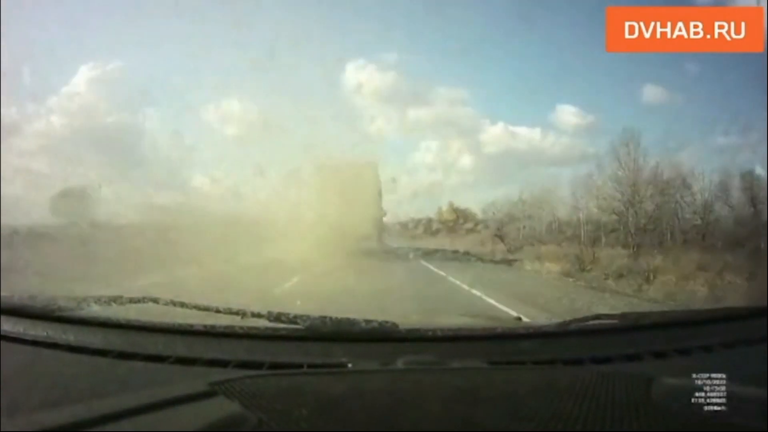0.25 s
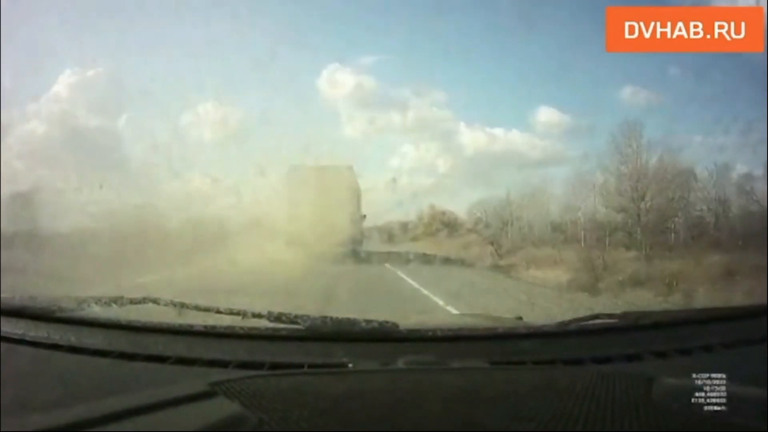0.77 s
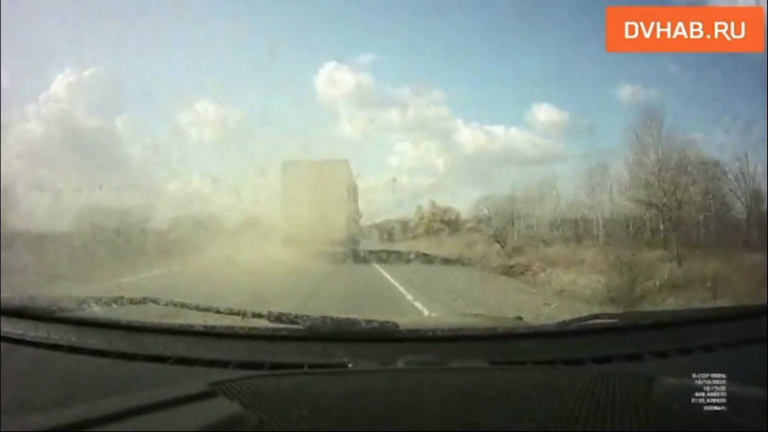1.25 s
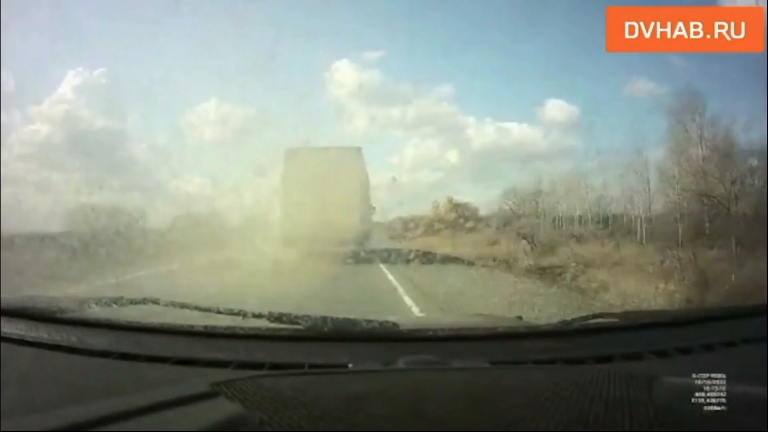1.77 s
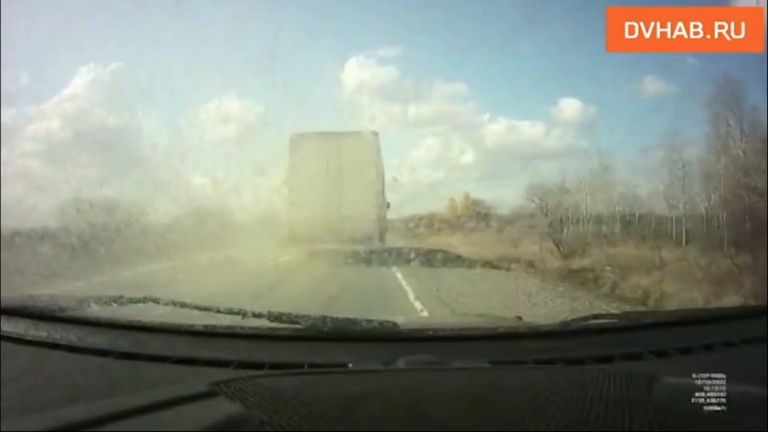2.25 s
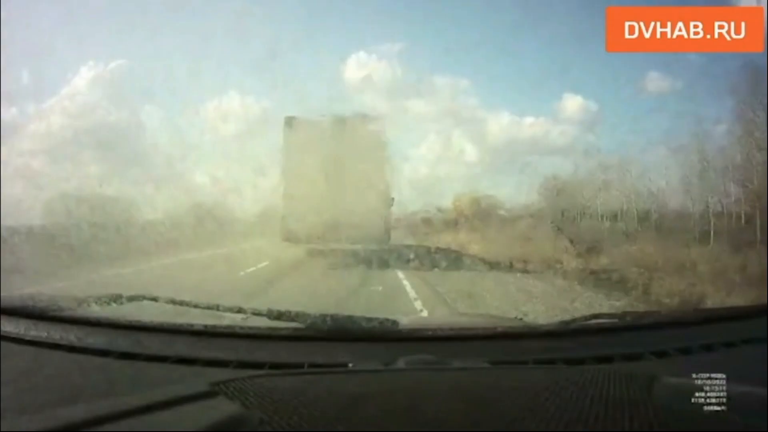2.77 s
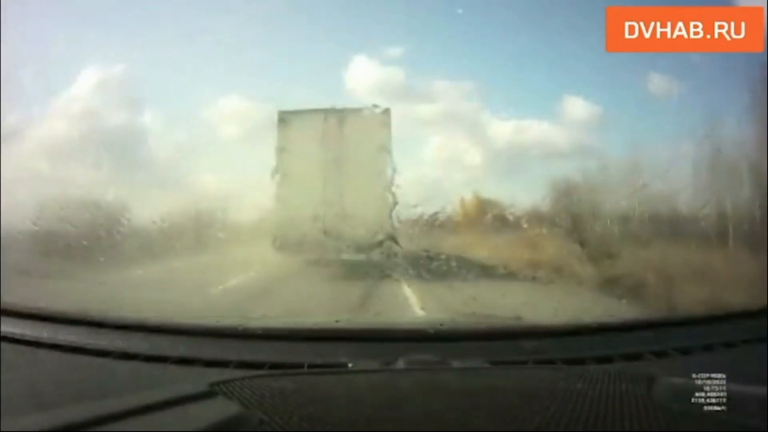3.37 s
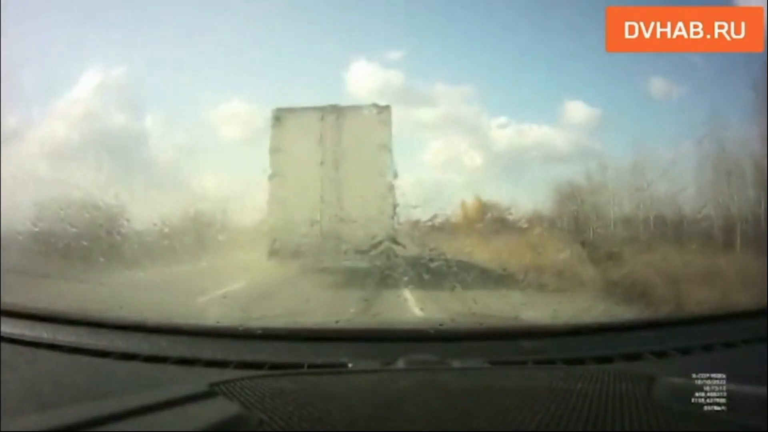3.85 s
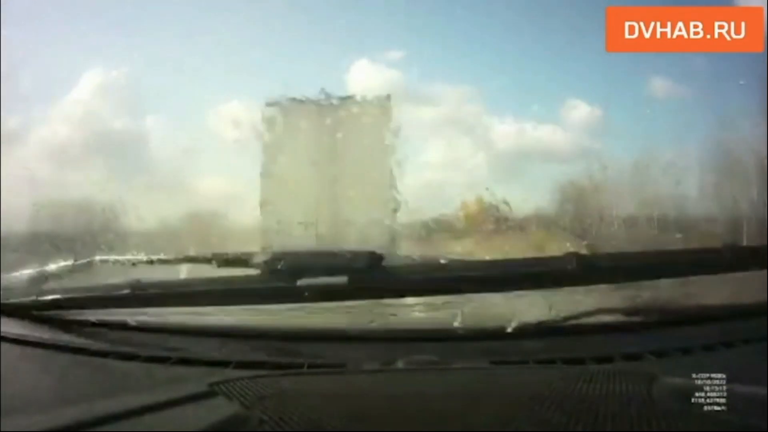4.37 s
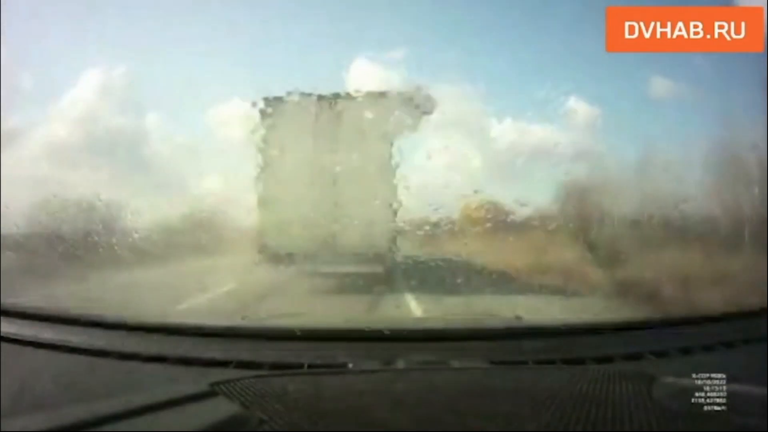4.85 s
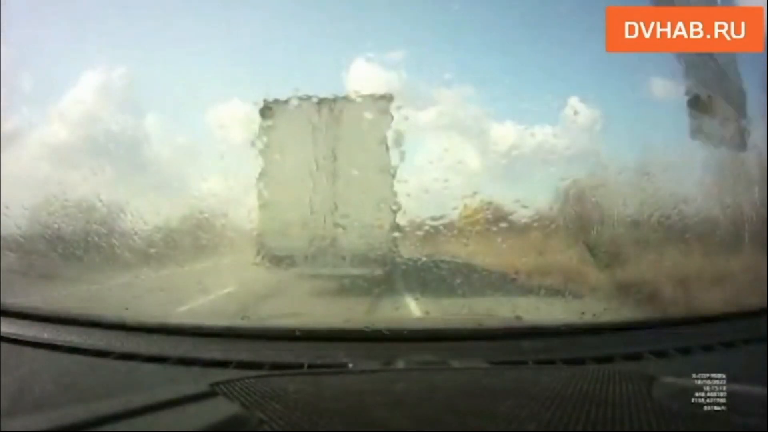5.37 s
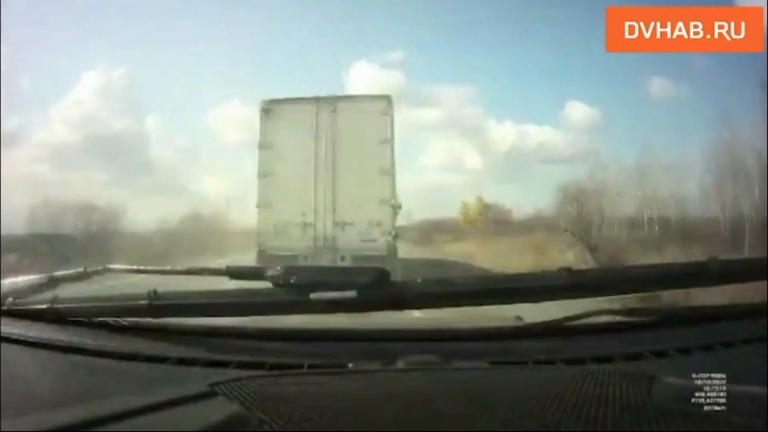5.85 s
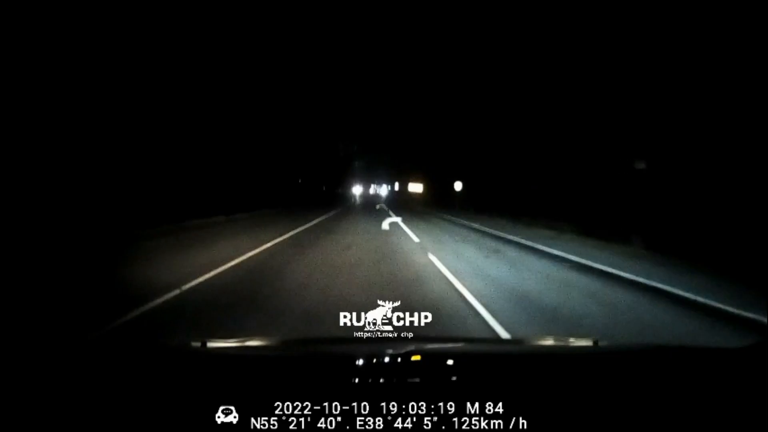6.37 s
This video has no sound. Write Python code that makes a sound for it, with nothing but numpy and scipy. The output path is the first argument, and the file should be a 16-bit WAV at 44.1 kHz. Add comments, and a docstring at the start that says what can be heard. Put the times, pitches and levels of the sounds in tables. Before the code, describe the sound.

Boomy cabin rumble with violent bumps and clattering dashboard calms as wipers thud and a washer hums, then jumps suddenly to another car's droning interior.

```python
"""Inside a car that follows a truck over a broken, dusty highway, heard at the windscreen.
Shaped noise gives the body's heave, cabin booms and tyre roar, which sink as the road smooths.
Decaying modes and noise bursts give the thuds of bumps and wipers, the dashboard knocks and plastic ticks.
Gliding tones give groans, drumming and two hums of the washer pump; grit and water hiss on the glass.
Near the end the scene switches abruptly to another car: wavering drone tones, road noise, clacking trim."""
import sys
import numpy as np
from scipy import signal
from scipy.fft import rfft, irfft
from scipy.io import wavfile
from scipy.ndimage import uniform_filter1d

SR = 44100
rng = np.random.default_rng(int(sys.argv[2]) if len(sys.argv) > 2 else 0)


def output_pcm(signal):
    """Save a mono or channel-first signal as 16-bit PCM at the path in sys.argv[1].

    Samples are clipped to [-1, 1] before scaling.
    """
    pcm = np.clip(np.atleast_2d(signal).T, -1, 1) * 32767
    wavfile.write(sys.argv[1], SR, np.round(pcm).astype(np.int16))


N = 291942
TIME = np.arange(N) / SR
SWITCH_S = 6.312  # the second car begins

# air resonances of the cabin: (frequency [Hz], width [Hz], boost [dB])
CABIN_BOOMS = [(85.8, 6.6, 7.5), (154, 35, 0.5), (221.5, 26, 4)]
# wiper reversals, one blade after the other: (time [s], thud level [dB], panel shudder [dB],
# panel pitch [Hz], slap on the glass [dB], crack relative to slap [dB], pitch the slap favours [Hz])
WIPER_REVERSALS = [(2.902, -14.5, -20, 192, -40.5, -14.5, 1096), (3.018, -10, -22, 156.4, -41, -13, 507),
                   (3.728, -20, -29, 226, -34.5, -30, 400), (3.845, -23, -25.5, 206.5, -38.5, -19, 490),
                   (4.466, -12.5, -25, 192, -38, -29, 702), (4.54, -11, -19, 147, -39, -22, 1100),
                   (5.231, -16, -24.5, 170.6, -39.5, -32, 380), (5.337, -23, -26, 157.4, -37.5, -28, 600),
                   (5.963, -11, -22.5, 169.5, -36.5, -23, 566), (6.041, -16.5, -24, 145, -42, -25, 1140)]


def amp(db):
    """Level is logarithmic: 20 dB is a tenfold gain in amplitude."""
    return 10 ** (np.asarray(db) / 20)


def unit(x):
    """Mean power sets level: scales a signal to rms 1."""
    return x / np.sqrt(np.mean(x ** 2) + 1e-20)


def add(mix, s, sound):
    """Superposition: sound pressures add, here from time s on."""
    part = mix[max(round(s * SR), 0):][:len(sound)]
    part += sound[:len(part)]


def noise(spectrum, resonances=(), size=N):
    """Spectral shaping: white noise filtered to a smooth spectrum with resonant humps, at rms 1."""
    hz = np.fft.rfftfreq(size, 1 / SR)
    f, db = np.transpose(spectrum)
    shape_db = np.interp(np.log(hz + 1), np.log(f), db)
    shape_db = shape_db - 40 * np.log10(np.maximum(hz / f[-1], 1))  # 12 dB/octave above the last point
    for centre, width, boost in resonances:
        shape_db = shape_db + boost / (1 + (2 * (hz - centre) / width) ** 2)
    return unit(irfft(rfft(rng.standard_normal(size)) * amp(shape_db), size))


def drift(rate):
    """Random modulation: noise of rms 1 under a Gaussian low-pass, down to 1/e in amplitude at rate [Hz]."""
    hz = np.fft.rfftfreq(N, 1 / SR)
    return unit(irfft(rfft(rng.standard_normal(N)) * np.exp(-(hz / rate) ** 2), N))


def steady(x, size):
    """Level compensation: division by the running rms evens out swells longer than size samples."""
    return x / np.sqrt(uniform_filter1d(x ** 2, size) + 1e-9)


def tone(hz):
    """Frequency modulation: phase is the running sum of frequency; a sine of rms 1."""
    return np.sqrt(2) * np.sin(2 * np.pi * np.cumsum(hz) / SR)


def fade(t, rise, t60):
    """Damping: a soft onset, then an exponential decay of 60 dB in t60 [s]."""
    return (1 - np.exp(-t / rise)) * amp(-60 * t / t60)


def lowpass(x, hz):
    """Band limitation: a steep, linear-phase low-pass."""
    return signal.oaconvolve(x, signal.firwin(301, hz, window=("kaiser", 8), fs=SR), "same")


def road_state():
    """Surface excitation: roughness and tyre roar [dB] at every moment."""
    # state of the road: (time [s], relative roughness [dB], relative tyre roar [dB])
    surface = [(0, 1, -38), (.6, -2.5, -41), (1.6, -3, -43.5), (2.7, -3, -47.5), (3.0, -8.5, -46),
               (3.35, -13.5, -51.5), (4.201, -16.5, -49), (4.999, -14.5, -51.5), (5.6, -18.5, -52),
               (6.299, -19.5, -52.5)]
    s, *columns = np.transpose(surface)
    return [np.interp(TIME, s, c) for c in columns]


def road():
    """Forced vibration: the surface heaves the body, excites the cabin booms and makes the tyres roar."""
    # noise spectra: (frequency [Hz], relative level [dB per Hz])
    heave_colour = [(12, -15.5), (22, 2.5), (31, 0.5), (42, -1.5), (54, -2.5), (68, -22.5), (110, -34.5)]
    rumble_colour = [(45, -30), (70, -2.5), (105, -2), (130, -6.5), (220, -13.5), (260, -18.5),
                     (340, -19.5), (440, -29), (700, -50)]
    roar_colour = [(250, -1), (450, 7.5), (620, 5.5), (900, 3), (1030, 5.5), (1330, 2.5), (1600, -10.5),
                   (2200, -17.5), (2800, -18), (3400, -29.5), (7000, -32)]
    heave_db, heave_follow = -26, 0.43  # level at roughness 0 dB, and change [dB] per dB of roughness
    rumble_db, rumble_follow = -22, 1
    rock_db, rock_rise_s, rock_t60_s = -13, 0.021, 1.44  # rocking after a thud, relative to the thud
    rough_db, roar_db = road_state()
    rocking_power = 0
    for s, db, *_ in all_thuds():
        rocking = amp(db + rock_db) * fade(np.maximum(TIME - s, 0), rock_rise_s, rock_t60_s)
        rocking_power = rocking_power + rocking ** 2
    heave_level = np.sqrt(amp(heave_db + heave_follow * rough_db) ** 2 + rocking_power)
    heave = heave_level * steady(noise(heave_colour), size=6000)
    rumble = steady(noise(rumble_colour, CABIN_BOOMS), size=5000)
    rumble = amp(rumble_db + rumble_follow * rough_db) * rumble
    flutter_db = 1.4 * drift(rate=16)
    roar = amp(roar_db - 3.5 + flutter_db) * noise(roar_colour)
    return heave + rumble + roar


def drumming(sub_db=-2, overtone_db=-8):
    """Periodic excitation: the wheels drum a wavering note with partials near an octave below and above."""
    # drumming of the wheels on the broken surface: (time [s], mean pitch [Hz])
    drum_pitch = [(0, 88.68), (.75, 87.65), (1.0, 89), (2.05, 88.46), (2.3, 80.1), (2.55, 81.67),
                  (2.8, 90.3)]
    drum_db, drum_follow = -23, 1.78  # base level at roughness 0 dB, and change [dB] per dB of roughness
    hz = np.interp(TIME, *np.transpose(drum_pitch))
    db = drum_db + drum_follow * road_state()[0]
    out = np.zeros(N)
    for k, level in [(.5, sub_db), (1, -0.83), (1.9, overtone_db)]:
        pitch = k * hz * (1 + 0.015 * drift(rate=12.7))
        out += amp(db + level + 2.8 * drift(rate=11.0)) * tone(pitch)
    return out


def groans(waver_hz=5.0, flutter_db=3.0):
    """Frequency glide: notes of tyres and body slide up exponentially, waver and die away."""
    # groans: (start [s], length [s], target pitch [Hz], relative level [dB], slide from below [Hz])
    groan_notes = [(.035, .72, 429, -39, 60), (.2, .3, 463, -39, 18), (0.22, .36, 540, -43.5, 11),
                   (0.26, .66, 730, -49.5, 8)]
    slide_s, rise_s, loss_db = .04, 0.027, 8.5  # time constants of pitch and level; loss of level by the end
    out, waver, flutter = np.zeros(N), drift(rate=45), drift(rate=14)
    for k, (s, length, hz, db, slide) in enumerate(groan_notes):
        t = np.arange(0, length, 1 / SR)
        own = slice(k * SR, k * SR + len(t))  # each note takes its own stretch of the random motion
        pitch = hz - slide * np.exp(-t / slide_s) + waver_hz * waver[own]
        level = amp(db - loss_db * t / length + flutter_db * flutter[own]) * (1 - np.exp(-t / rise_s))
        add(out, s, level * tone(pitch) * signal.windows.tukey(len(t), .2))
    return out


def all_thuds():
    """Impulsive excitation: bumps and wipers as (time, level, pitch, shudder level, panel pitch)."""
    # bumps: (time [s], relative level [dB], pitch [Hz], relative panel shudder [dB], panel pitch [Hz])
    bumps = [(.081, -2.5, 76, -33, 165), (.268, -4, 41.2, -37, 214), (.652, -5, 73, -27, 145),
             (.766, -10.5, 72.5, -24.5, 263.5), (1.113, -8, 78.7, -26, 153), (1.305, -5, 89.9, -19, 172),
             (2.579, -17.5, 100, -21.5, 310), (4.864, -18, 83.3, -25, 198.3),
             (5.026, -18.5, 138, -31.5, 146), (6.085, -23.5, 70.6, -36.5, 166.5)]
    wiper_hz = 77.4  # thud pitch that all reversals share
    wipers = [(s, db, wiper_hz, shudder_db, panel_hz)
              for s, db, shudder_db, panel_hz, *_ in WIPER_REVERSALS]
    return list(bumps) + wipers


def thuds(swing_db=-1, panel_db=3, judder_db=-5, tail_db=-11, tail_t60=0.41):
    """Damped oscillation: a blow swings the cabin air, a panel rings and judders, and a low tail rings on."""
    # modes of a shuddering panel: (multiple of its pitch, relative level [dB], t60 [s])
    panel_modes = [(1, 1.5, 0.13), (1.461, -6, 0.085), (1.9, -8, 0.055)]
    judder_colour = [(70, -5.5), (130, 10.0), (240, 7), (290, -7.5), (360, -18), (500, -27.5), (800, -27.0)]
    tail_colour = [(90, -16), (130, 2.5), (225, -4), (280, -15.5), (500, -50.0)]
    out, t = np.zeros(N), np.arange(14000) / SR
    for s, db, hz, shudder_db, panel_hz in all_thuds():
        swing = np.sin(2 * np.pi * hz * t) * fade(t, rise=0.0021, t60=0.16)
        ring = sum(amp(level) * np.sin(2 * np.pi * k * panel_hz * t) * fade(t, rise=.003, t60=t60)
                   for k, level, t60 in panel_modes)
        judder = steady(noise(judder_colour, size=len(t)), size=400) * fade(t, rise=0.0023, t60=0.1)
        tail = noise(tail_colour, CABIN_BOOMS, size=len(t)) * fade(t, rise=0.0048, t60=tail_t60)
        panel = ring + amp(judder_db) * judder + amp(tail_db) * tail
        add(out, s, amp(db + swing_db) * swing + amp(panel_db + shudder_db) * panel)
    return out


def all_knocks(slap_t60=0.099):
    """Impulsive excitation: knocks and wiper slaps as (time, level, crack level, favoured pitch, t60)."""
    # knocks of dashboard and glass: (time [s], relative level [dB], crack relative to knock [dB],
    # pitch the blow favours [Hz], t60 of the clatter [s])
    dashboard_knocks = [(.588, -22.5, -21.5, 780, 0.25), (.766, -35, -16, 1120, 0.14),
                        (.868, -20.5, -34, 990, 0.11), (.953, -31, -32, 435, 0.074),
                        (1.088, -29.5, -37, 1100, 0.17), (1.286, -26.5, -38, 635, .11),
                        (2.443, -29.5, -35, 1300, 0.076), (2.576, -19, -37.5, 760, 0.1),
                        (2.763, -31, -16.5, 1600, .048), (3.069, -35.5, -10, 1593, 0.092),
                        (4.646, -40, -9.5, 1104, 0.13), (4.869, -35.5, -31, 613, 0.084),
                        (5.235, -37.5, -14, 1340, .022), (5.947, -34.5, -42, 690, 0.13)]
    slaps = [(s, db, crack_db, hz, slap_t60) for s, *_, db, crack_db, hz in WIPER_REVERSALS]
    return list(dashboard_knocks) + slaps


def knocks(ring_db=-5.0, clatter_db=-8, crack_db=-1.5, trim_db=3, focus_db=6.5, rise_share=0.022):
    """Modal excitation: a knock rings modes near its favoured pitch, with a dull clatter and a crack."""
    # modes of the dashboard, and of the trim in the crack: (frequency [Hz], relative level [dB], t60 [s])
    dashboard_modes = [(296.5, 8, 0.17), (359, 11, 0.08), (545, -2, 0.1), (617, -6, 0.12), (773, -3, 0.12),
                       (922, -11, 0.12), (1014, -6, 0.1), (1209, -3, 0.07), (1283, -11.5, 0.071)]
    trim_modes = [(1227, -2.5, 0.33), (1420, 5, 0.048), (1583, 0.5, 0.048), (1844, 0, .07),
                  (2490, -14.5, 0.1), (2830, -12, 0.12), (3460, -12.5, .06)]
    rebound_s, rebound_db = 0.016, -8  # loose parts strike once more after each knock
    clatter_colour = [(200, 2.5), (550, -0.5), (1300, -8), (1600, -21.5), (3000, -31.5)]
    crack_colour = [(900, -15.0), (1400, 6), (1850, 5.5), (2250, -2.5), (2750, 4.0), (3250, -11),
                    (3900, -4.0), (6000, -26.5)]
    out, t = np.zeros(N), np.arange(9000) / SR
    for s, db, bright_db, centre, length in all_knocks():
        rise = rise_share * length  # long knocks start softly
        ring = sum(amp(level - focus_db * np.log2(hz / centre) ** 2) * fade(t, rise, t60)
                   * np.sin(2 * np.pi * (hz * t + rng.random())) for hz, level, t60 in dashboard_modes)
        focused = [(hz, level - focus_db * np.log2(hz / centre) ** 2) for hz, level in clatter_colour]
        clatter = noise(focused, size=len(t)) * fade(t, rise, length)
        crack = noise(crack_colour, size=len(t)) * fade(t, rise, length)
        crack = crack + sum(amp(trim_db + level) * fade(t, rise, t60)
                            * np.sin(2 * np.pi * (hz * t + rng.random())) for hz, level, t60 in trim_modes)
        knock = amp(ring_db) * ring + amp(clatter_db) * clatter + amp(crack_db + bright_db) * crack
        add(out, s, amp(db) * knock)
        add(out, s + rebound_s, amp(db + rebound_db + clatter_db) * clatter)
    return out


def ticks(tick_db=1, ring_db=-14, rattle_db=-17, rattle_per_s=90, rattle_t60=0.17,
          buzz_db=-63, buzz_fade_db_per_s=8):
    """Contact noise: plastic snaps, rings and rattles by random touches; a buzz of its modes sinks slowly."""
    # plastic ticks of the mount: (time [s], relative level [dB])
    snaps = [(.002, -29.5), (0.12, -39), (0.213, -41), (0.284, -38.5)]
    # spectrum of a tick: (frequency [Hz], relative level [dB per Hz])
    snap_colour = [(900, 9), (2600, -1.5), (3400, -5), (4400, -9), (5700, -7.5), (6500, -17.5), (8000, -22),
                   (9500, -24.5), (14000, -31)]
    # modes of the mount: (frequency [Hz], relative level [dB], t60 [s])
    mount_modes = [(2040, -8.5, 0.049), (2760, -9.5, .2), (3800, -10.5, 0.061), (5440, -11.5, 0.025),
                   (7760, -13.5, 0.06)]
    out, t = np.zeros(N), np.arange(9000) / SR
    ring = sum(amp(db) * fade(t, 0.00045, t60) * np.sin(2 * np.pi * (hz * t + rng.random()))
               for hz, db, t60 in mount_modes)
    touches = rng.standard_normal(N) * (rng.random(N) < rattle_per_s / SR)
    touch = noise(snap_colour, size=len(t)) * fade(t, rise=0.00025, t60=0.0096)
    rattle = unit(signal.oaconvolve(touches, touch)[:N])
    for s, db in snaps:
        snap = noise(snap_colour, size=len(t)) * fade(t, rise=0.00022, t60=0.074)
        add(out, s, amp(db) * (amp(tick_db) * snap + amp(ring_db) * ring))
        out += amp(db + rattle_db) * rattle * fade(np.maximum(TIME - s, 0), 0.0032, rattle_t60)
    buzz = unit(signal.oaconvolve(touches, ring)[:N])
    return out + amp(buzz_db - buzz_fade_db_per_s * TIME) * buzz


def squeaks(pitch_hz=2750, hoarse_hz=110):
    """Friction: rubbing trim gives short high notes, hoarse by random frequency and amplitude modulation."""
    # squeaks: (start [s], length [s], level [dB])
    rubs = [(.01, 0.074, -59), (0.208, 0.12, -61)]
    out = np.zeros(N)
    note = tone(pitch_hz + hoarse_hz * drift(rate=260)) * drift(rate=79)
    for s, length, db in rubs:
        part = note[round(s * SR):][:round(length * SR)]
        add(out, s, amp(db) * part * signal.windows.tukey(len(part), .5))
    return out


def swishes(width_hz=600, hump_db=7, chatter_db=5.0):
    """Friction noise: water and wiper rubber hiss over the glass in swells with a chattering level."""
    # swishes: (start [s], length [s], relative level [dB], centre of the hump [Hz])
    strokes = [(3.081, 0.43, -63, 2280), (3.62, 0.35, -57, 1250), (4.0, 0.47, -60.5, 1400),
               (4.716, .12, -59.5, 1960), (4.919, 0.24, -55.5, 1348), (6.059, 0.3, -62, 1200)]
    # spectrum: (frequency [Hz], relative level [dB per Hz])
    swish_colour = [(600, -11), (1200, 11.5), (1600, -1), (2900, -3.5), (3600, -11.5), (6000, -19)]
    out, chatter = np.zeros(N), amp(chatter_db * drift(rate=13))
    for s, length, db, hz in strokes:
        hiss = noise(swish_colour, [(hz, width_hz, hump_db)], size=SR)[:round(length * SR)]
        add(out, s, amp(db) * hiss * signal.windows.tukey(len(hiss), .8))
    return out * chatter


def spray(grains_per_s=70, grain_db=-11, gust_db=0.73):
    """Shot noise: random taps of grit on the windscreen stand out of a fine hiss."""
    # fizz of grit and spray on the glass: (time [s], relative level [dB])
    fizz = [(0, -61.5), (1.5, -62.5), (2.8, -60.5), (3.25, -58), (3.6, -60), (6.3, -61)]
    # spectrum of the hiss: (frequency [Hz], relative level [dB per Hz])
    hiss_colour = [(300, 6.5), (1400, 5.5), (2000, 1.5), (3000, -4), (5000, -8), (7000, -12.5),
                   (9500, -15.5), (12000, -15), (15000, -27.5)]
    tap_colour = [(500, -12.5), (1300, -0.5), (2800, -11.0), (6000, -14.0)]
    t = np.arange(900) / SR
    sizes = amp(4.2 * np.minimum(rng.exponential(1, N), 3))
    sizes = sizes * (rng.random(N) < grains_per_s / SR)
    tap = noise(tap_colour, size=900) * fade(t, rise=0.00074, t60=0.051)
    grains = unit(signal.oaconvolve(sizes, tap)[:N])
    level = amp(np.interp(TIME, *np.transpose(fizz)) + gust_db * drift(rate=19))
    return level * (noise(hiss_colour) + amp(grain_db) * grains)


def pump(ripple_db=0.0, waver=0.0047):
    """Rotating machinery: the washer motor spins up to its note, and its unsteady hum sinks in level."""
    # squirts of the washer: (start [s], length [s], relative level [dB], spin-up time constant [s])
    squirts = [(2.61, 0.65, -40.5, 0.1347), (3.918, 0.88, -39, 0.0574)]
    # partials of the hum: (multiple of its pitch, relative level [dB])
    hum_partials = [(1, 0.5), (3, -23)]
    run_hz, start_hz = 349.5, 321
    sink_db, settle_s = 18.5, 0.73  # eventual loss of the fundamental, and its time constant
    out = np.zeros(N)
    for s, length, db, spin_up in squirts:
        t = np.arange(0, length, 1 / SR)
        hz = run_hz + (start_hz - run_hz) * np.exp(-t / spin_up)
        hz = hz * (1 + waver * drift(rate=42)[:len(t)])
        sunk_db = sink_db * (1 - np.exp(-t / settle_s))
        # higher partials sink less
        hum = sum(amp(db + level - sunk_db / k) * tone(k * hz) for k, level in hum_partials)
        add(out, s, hum * amp(ripple_db * drift(rate=35)[:len(t)]) * signal.windows.tukey(len(t), .08))
    return out


def whine():
    """Frequency modulation: faint high tones of electronics wander, and a whistle flickers as it sinks."""
    # held tones: (frequency [Hz], level [dB], relative wander [Hz])
    held_tones = [(3486, -82, 4.5), (3940, -83.5, 15), (4310, -80, 4), (4990, -82, 18), (6000, -87, 4),
                  (7825, -73, 20)]
    # whistle that sinks in pitch: (time [s], mean frequency [Hz], level before flicker [dB])
    whistle = [(0.601, 5200, -81), (1.101, 4870, -80), (1.601, 4490, -75.5), (2, 4185, -81)]
    held = sum(amp(db) * tone(hz + wander * (0.77 * drift(rate=2.5) + 1.3 * drift(rate=90)))
               for hz, db, wander in held_tones)
    s, hz, db = np.transpose(whistle)
    pitch = np.interp(TIME, s, hz) + 28 * drift(rate=130)
    sinking = np.interp(TIME, s, amp(db), left=0, right=0) * tone(pitch)
    flicker = 1 + np.tanh(drift(rate=40)) / 2
    return held + sinking * flicker


def other_car(cabin_db=-32, flutter_db=3.5, throb_db=3.5, waver_hz=3):
    """Amplitude modulation: drone tones throb over fluttering road noise, with clacking trim."""
    # drone: (frequency [Hz], mean level [dB])
    drone_tones = [(114.3, -42), (140.5, -34), (318, -42.5), (393, -47.5), (425.3, -45.5), (603, -61),
                   (716, -54), (786, -58.5), (818, -59), (926, -60)]
    # spectrum of the road noise: (frequency [Hz], relative level [dB per Hz])
    cabin_colour = [(20, -12), (45, 4), (75, 2.5), (115, -3.5), (175, -6), (270, -10.5), (400, -11.5),
                    (600, -18), (850, -19.5), (1700, -30), (2700, -37.5), (4700, -42.5), (5600, -56),
                    (6700, -50.5)]
    drone = sum(amp(db + throb_db * drift(rate=14)) * tone(hz + waver_hz * drift(rate=23.5))
                for hz, db in drone_tones)
    cabin = amp(cabin_db + flutter_db * drift(rate=25)) * noise(cabin_colour)
    return drone + cabin + clacks()


def clacks(clack_db=-2, hump_hz=2900, hump_width_hz=900, hump_db=6):
    """Impact noise: loose trim clacks unevenly, each damped burst with its own resonant band."""
    # clacks: (time [s], relative level [dB])
    trim_clacks = [(6.32, -39), (6.347, -38.5), (6.374, -42), (6.403, -43.5), (6.430, -44), (6.452, -47),
                   (6.476, -39.5), (6.507, -47), (6.555, -39.5), (6.585, -45), (6.611, -36)]
    # spectrum: (frequency [Hz], relative level [dB per Hz])
    clack_colour = [(700, 6), (1700, -7), (2600, 0), (3900, -7.5), (4500, 0.5), (5200, -11), (5650, -16),
                    (6200, -15.5), (6700, -9)]
    out, t = np.zeros(N), np.arange(4000) / SR
    for s, db in trim_clacks:
        hump = [(hump_hz * rng.uniform(0.68, 1.26), hump_width_hz, hump_db)]
        burst = noise(clack_colour, hump, size=len(t)) * fade(t, rise=0.00071, t60=0.078)
        add(out, s, amp(db + clack_db) * burst)
    return out


def switch_click(click_db=-21):
    """Discontinuity: the abrupt change of scene makes a step that decays within milliseconds."""
    out, t = np.zeros(N), np.arange(400) / SR
    add(out, SWITCH_S, amp(click_db) * np.exp(-t / 0.00037))
    return out


def scene():
    """Superposition: the first car's sources, then a hard switch to the second car in a narrower band."""
    first = road() + drumming() + groans() + thuds() + knocks() + ticks() + squeaks()
    first = first + swishes() + spray() + pump() + whine()
    second = lowpass(other_car(), 7000)
    return (np.where(TIME < SWITCH_S, first, second) + switch_click())[None]


def record(dry):
    """Band limitation: the microphone passes little above 15.5 kHz."""
    return lowpass(dry[0], 15500)[None]


dry = scene()
out = record(dry)
output_pcm(out)
```